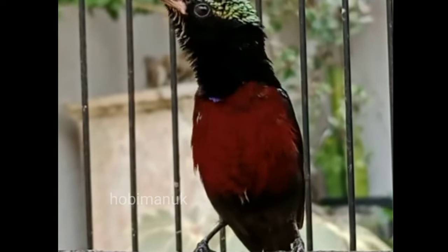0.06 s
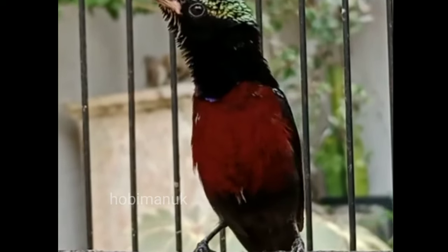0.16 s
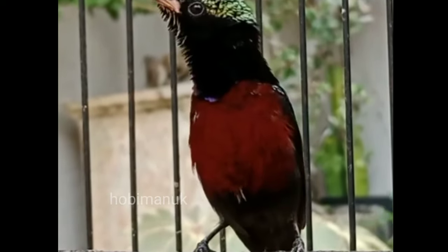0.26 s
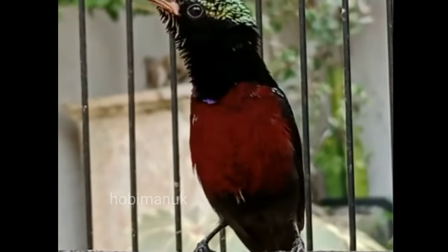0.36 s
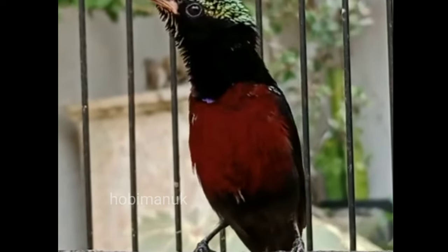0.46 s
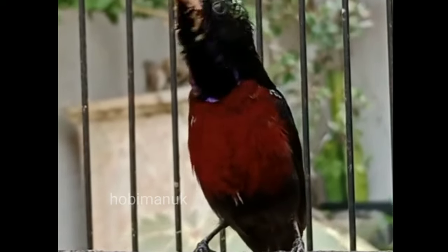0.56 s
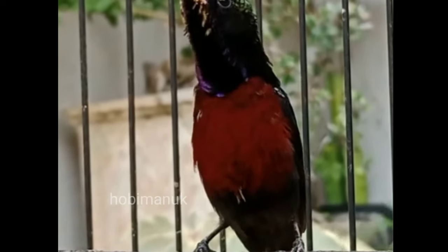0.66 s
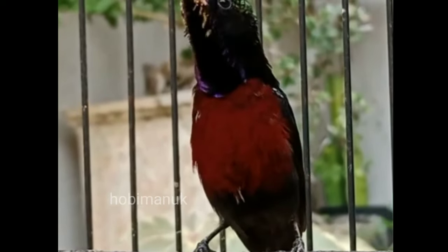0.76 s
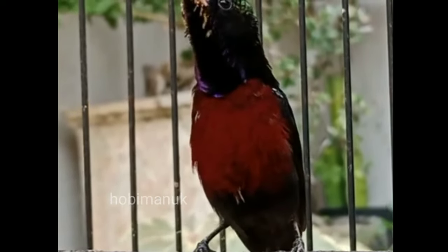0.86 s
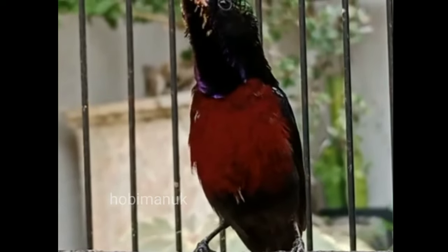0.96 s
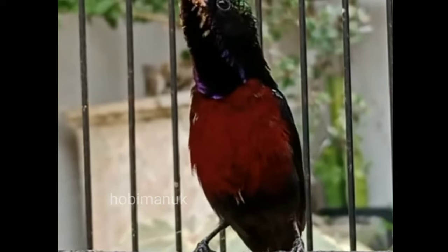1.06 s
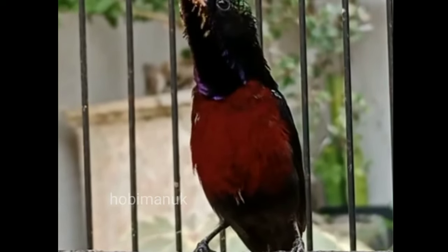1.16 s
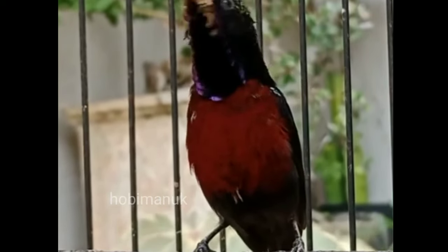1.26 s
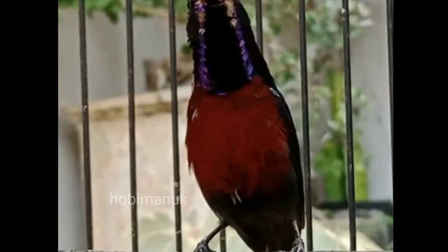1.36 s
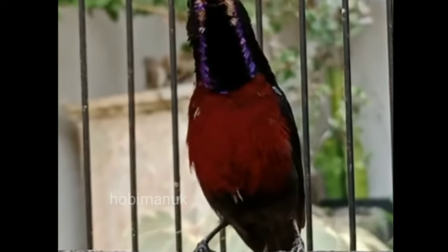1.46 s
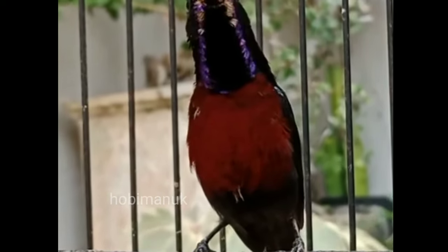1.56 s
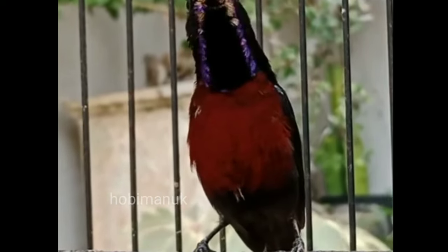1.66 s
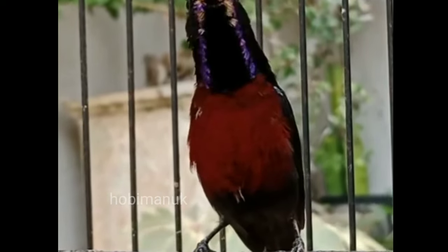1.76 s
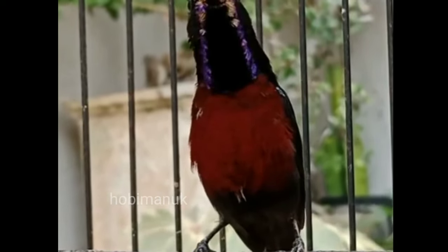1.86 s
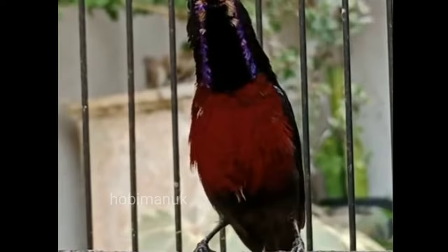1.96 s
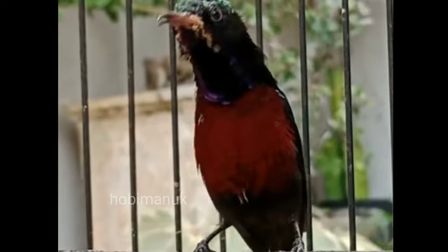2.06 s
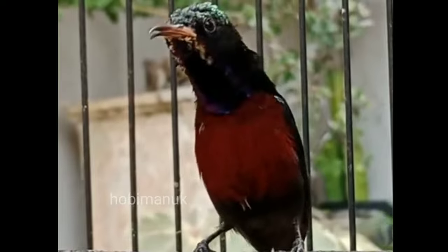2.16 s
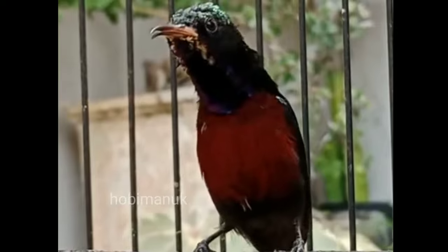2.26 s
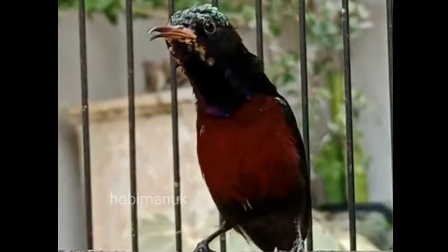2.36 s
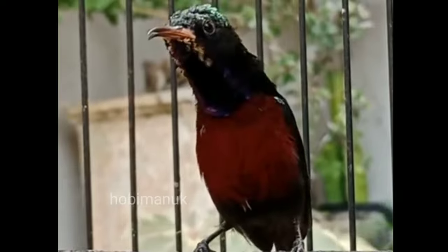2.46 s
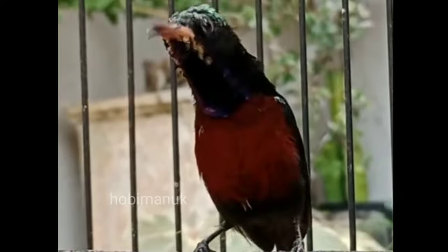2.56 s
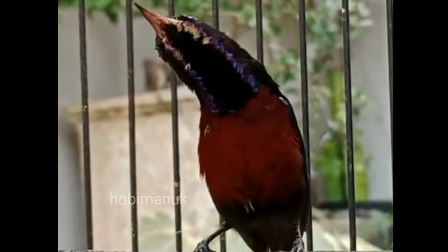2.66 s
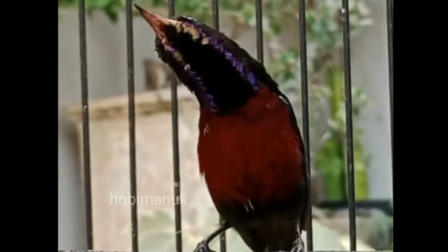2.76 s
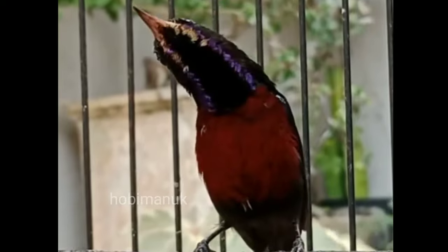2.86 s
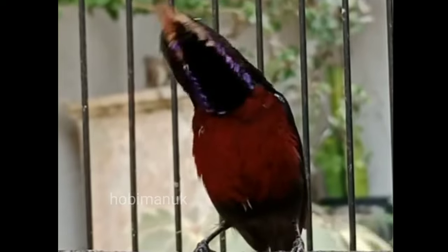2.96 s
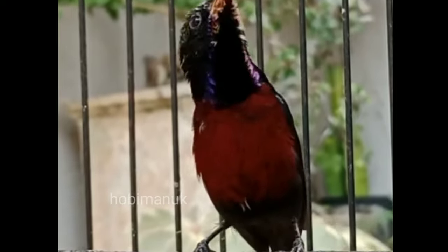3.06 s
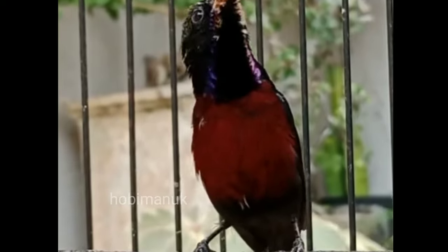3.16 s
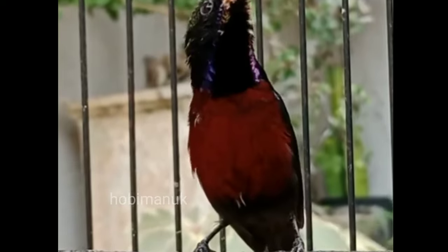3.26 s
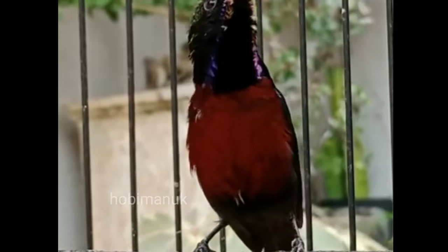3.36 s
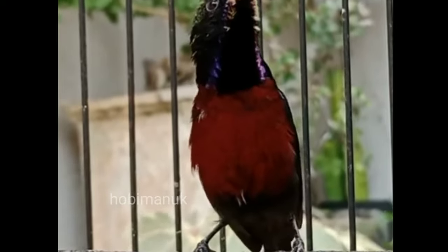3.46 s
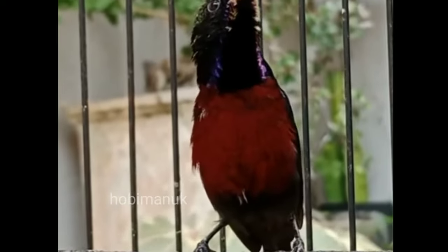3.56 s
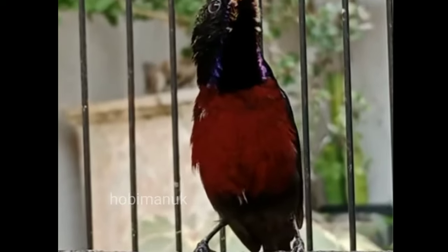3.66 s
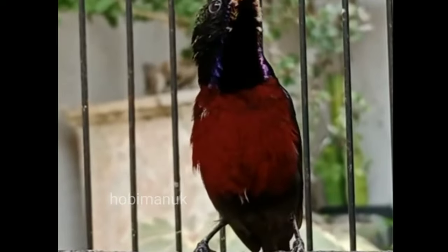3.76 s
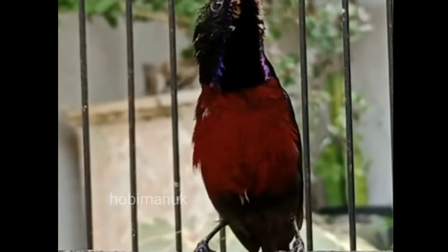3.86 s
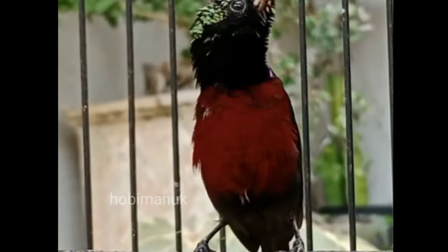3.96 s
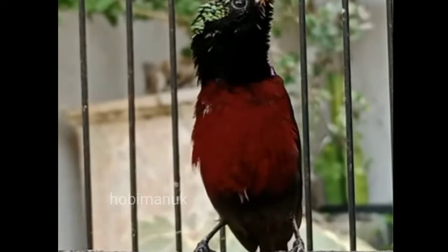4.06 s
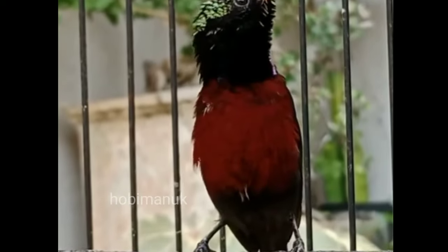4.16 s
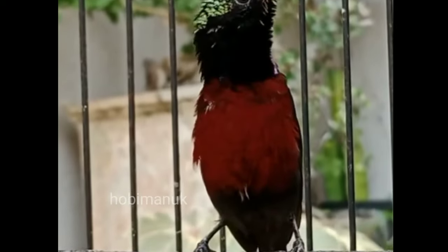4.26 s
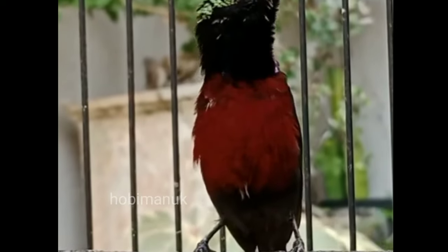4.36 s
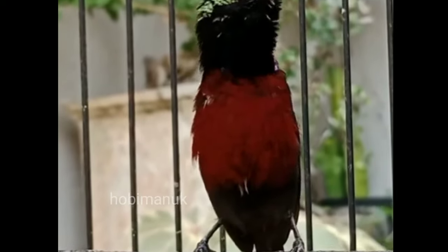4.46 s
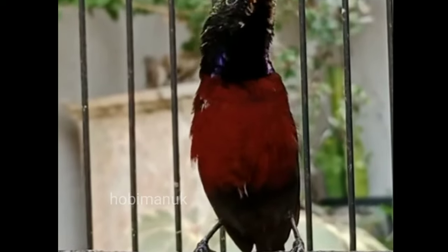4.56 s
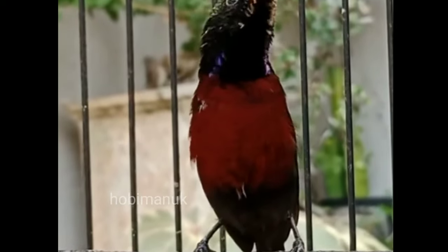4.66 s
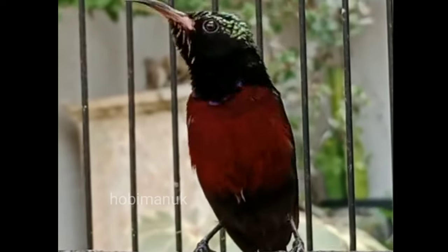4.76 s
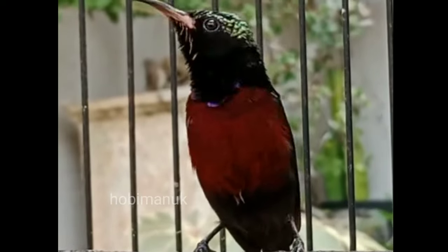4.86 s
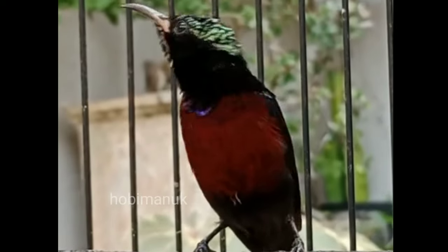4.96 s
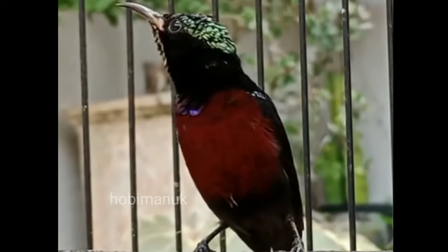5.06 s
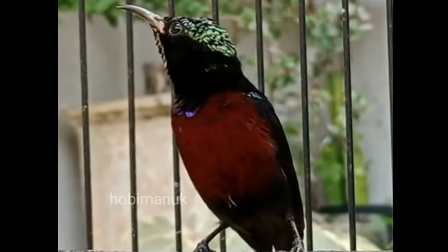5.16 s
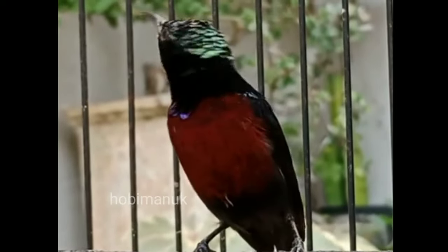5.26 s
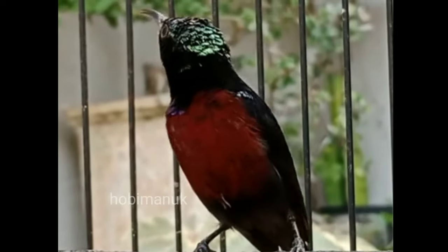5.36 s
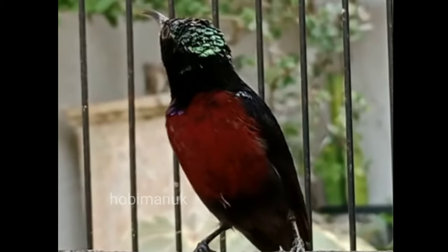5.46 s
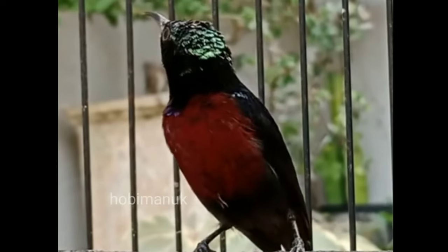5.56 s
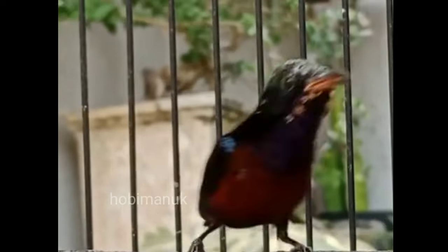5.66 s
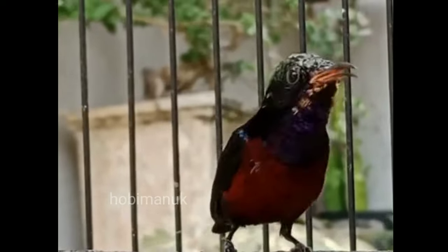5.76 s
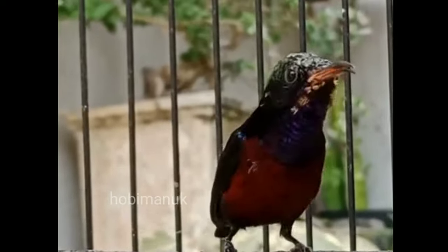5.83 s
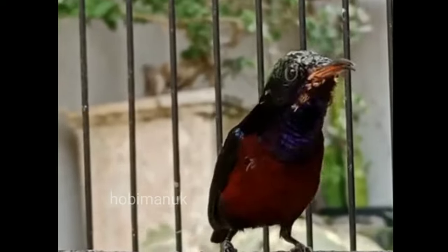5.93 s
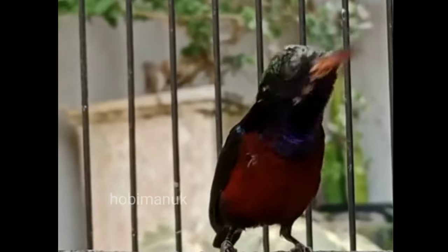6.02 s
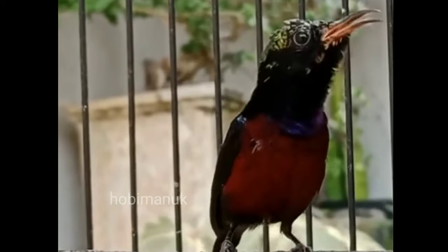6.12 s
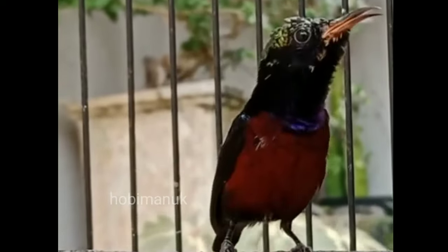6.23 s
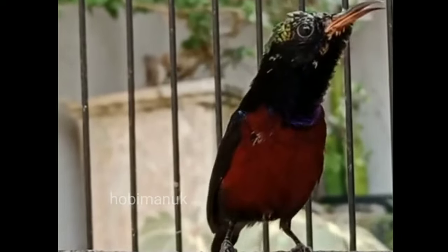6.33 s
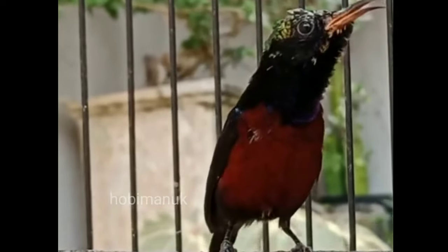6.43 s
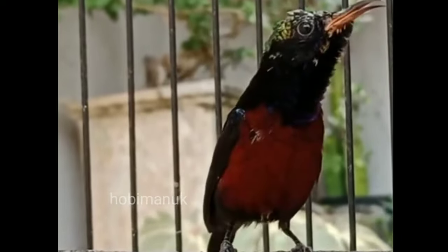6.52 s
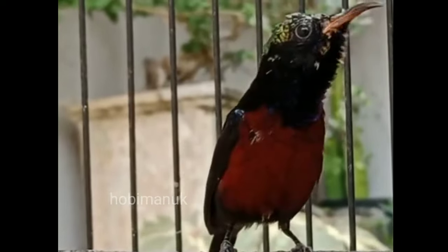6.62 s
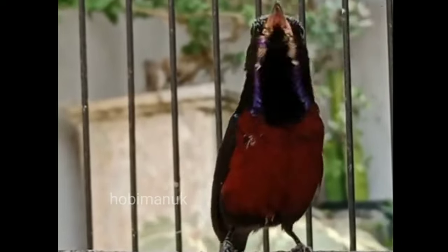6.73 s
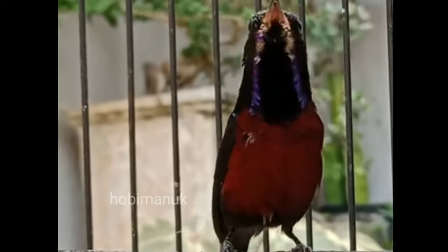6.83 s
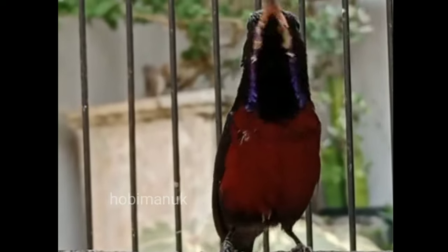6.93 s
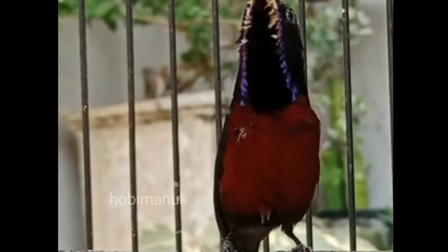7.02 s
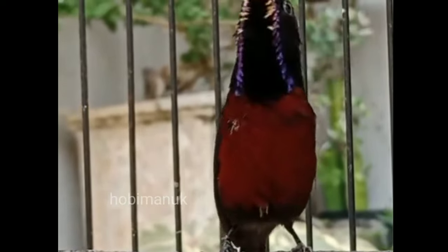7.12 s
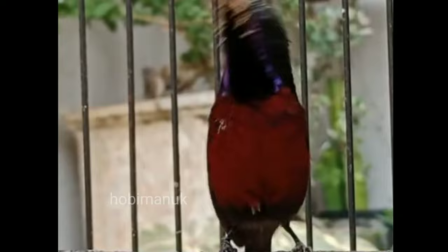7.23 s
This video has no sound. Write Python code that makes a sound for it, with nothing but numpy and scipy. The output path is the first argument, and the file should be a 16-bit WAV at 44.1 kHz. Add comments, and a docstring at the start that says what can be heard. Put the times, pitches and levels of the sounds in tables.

```python
"""The last few milliseconds of a shrill buzz open over faint hiss: a caged sunbird sings right at the
microphone in a small yard. Whistles and buzzes are sines with unsteady pitch; raspy upward chips are sweeps
with sidebands; two-voiced notes add sum tones. A limiter holds the loudest notes down, with slight clipping,
and walls answer briefly.
Behind it, wind noise swells and thumps, bubbles of water trickle and another bird calls far off."""
import sys
import numpy as np
from scipy import signal
from scipy.fft import rfft, irfft, next_fast_len
from scipy.io import wavfile
from scipy.ndimage import uniform_filter1d, map_coordinates

SR = 44100
rng = np.random.default_rng(int(sys.argv[2]) if len(sys.argv) > 2 else 0)


def transcribe(signal):
    """Save signal, clipped to [-1, 1], as a 16-bit WAV file at the path in sys.argv[1]."""
    frames = np.atleast_2d(signal).T
    limited = np.clip(frames, -1, 1)
    pcm = np.round(limited * 32767).astype(np.int16)
    wavfile.write(sys.argv[1], SR, pcm)


N = 321472

# colour of the air noise inside a sung note: (frequency_hz, density_db per Hz)
RASP_SPECTRUM = [(1500, -26), (2800, -2.5), (3600, 7), (4900, -7), (6500, -11.5), (9500, 0), (11500, -5.5),
                 (14300, -4.5), (15500, -24)]


def amp(db):
    """Decibels to linear gain."""
    return 10 ** (np.asarray(db) / 20)


def unit(x):
    """Scale a signal to rms 1."""
    return x / np.sqrt(np.mean(x ** 2) + 1e-20)


def along(points, hz):
    """Read a curve of (Hz, value) points on a log frequency axis."""
    f, v = np.transpose(points)
    return np.interp(np.log(np.abs(hz) + 1), np.log(f + 1), v)


def filtered(x, response):
    """Multiply the spectrum of x by a response of frequency."""
    n = x.shape[-1]
    m = next_fast_len(n + 2048)
    return irfft(rfft(x, m) * response(np.fft.rfftfreq(m, 1 / SR)), m)[..., :n]


def coloured(x, spectrum):
    """Filter x by a curve of (Hz, dB) points."""
    return filtered(x, lambda hz: amp(along(spectrum, hz)))


def noise(spectrum, size=N):
    """Coloured noise of rms 1."""
    return unit(coloured(rng.standard_normal(size), spectrum))


def wobble(t, rate):
    """A smooth random curve over a note, with rate knots a second."""
    return map_coordinates(rng.standard_normal(1024), [t * rate], mode="wrap")


def cycle(hz):
    """Phase of an oscillator that follows a pitch curve."""
    return 2 * np.pi * np.cumsum(hz) / SR


def partial(hz, phase):
    """A sine that fades out as its pitch climbs from 17.8 to 19.8 kHz."""
    return np.sin(phase) * np.clip((SR * .45 - hz) / 2000, 0, 1)


def arc(length, start_hz, middle_hz, end_hz):
    """A note's clock and its pitch, which bends in one smooth arch or dip."""
    t = np.arange(int(length * SR)) / SR
    u = t / length
    bend = middle_hz - (start_hz + end_hz) / 2
    return t, start_hz + (end_hz - start_hz) * u + bend * (1 - (2 * u - 1) ** 2)


def envelope(t, attack, release, depth_db):
    """Gain of a note: it climbs from depth_db down, holds, and sinks back."""
    shortfall = np.maximum(1 - t / attack, 0) + np.maximum(1 - (t[-1] - t) / release, 0)
    return amp(-depth_db * shortfall)


def add(track, s, note, edge=0.00067):
    """Lay a note into the track at s seconds, its ends softened over edge seconds."""
    k = np.arange(len(note))
    fade = np.clip(np.minimum(k, k[::-1]) / (edge * SR), 0, 1)
    note = note * np.sin(np.pi / 2 * fade) ** 2
    part = track[max(0, round(s * SR)):][:len(note)]
    part += note[:len(part)]


def patchy(x, patchy_db=4.0):
    """Outdoor air swells and fades in patches of time and pitch."""
    z = signal.stft(x, nperseg=512)[2]
    across_pitch = uniform_filter1d(rng.standard_normal(z.shape), size=7, axis=0)
    field = uniform_filter1d(across_pitch, size=14, axis=1)
    return unit(signal.istft(z * amp(patchy_db * unit(field)), nperseg=512)[1][:N])


def air():
    """Background hiss of the yard: patchy noise in the middle and a part of opposite sign left and right."""
    # slow level of the hiss, before the mix trims: (time_s, level_db)
    hiss_level = [(0, -45.5), (2.1, -48), (4.5, -47), (5.1, -51), (6.2, -46.5), (7.29, -45.5)]
    # colour of the middle: (frequency_hz, density_db per Hz)
    middle_spectrum = [(100, -7.5), (250, -4), (500, -7), (1000, -10), (2000, -9), (5000, -8.5),
                       (8000, -17), (11000, -8.5), (15500, -15.5)]
    # colour of the part that differs left to right: (frequency_hz, density_db per Hz)
    side_spectrum = [(40, 3.5), (150, -4), (400, -19.5), (1200, -11.5), (5000, -8), (8000, -14.5),
                     (15500, -7.5)]
    gain = amp(np.interp(np.arange(N) / SR, *np.transpose(hiss_level)))
    middle = amp(0.5) * gain * patchy(noise(middle_spectrum))
    side = amp(-0.5) * gain * noise(side_spectrum)
    return middle + np.array([side, -side])


def gusts(rise_db_per_s=297, draught_db=-46):
    """Strength of the wind: each gust builds quickly and dies away over a steady draught."""
    # gusts that swell the rumble: (peak_s, rumble_db, fall_db per s)
    gust_rows = [(1.33, -18.5, 80.5), (1.43, -17.5, 63.5), (2.2, -36.5, 66), (2.71, -21, 66),
                 (3.0, -35, 101), (3.46, -37, 90), (5.96, -39, 39)]
    t = np.arange(N) / SR
    power = amp(draught_db) ** 2
    for s, db, fall_db in gust_rows:
        drop_db = np.maximum(rise_db_per_s * (s - t), fall_db * (t - s))
        power = power + amp(db - drop_db) ** 2
    return np.sqrt(power)


def wind(unrest=0.066):
    """A low draught of rumbling noise, and single eddies that thump on the microphone."""
    # colour of the rumble: (frequency_hz, density_db per Hz)
    rumble_spectrum = [(15, -12), (35, -7), (60, -2.5), (120, -8.5), (200, -21), (400, -39), (1200, -64.5)]
    # eddies: (centre_s, half-width_s of the bell-shaped swell at 1/e, pitch_hz, peak_db)
    eddies = [(1.336, 0.01, 79.6, -6), (1.36, 0.027, 48.5, -12), (1.423, 0.0048, 113, -0.5),
              (1.448, 0.024, 50.7, -0.5), (1.513, 0.026, 41.6, -9.5), (1.579, 0.021, 54.7, -17),
              (2.715, 0.0185, 65, -8), (2.798, 0.01, 88, -16), (2.818, 0.019, 49, -16.5),
              (3.007, 0.023, 52, -17.5)]
    out = gusts() * noise(rumble_spectrum)
    for s, length, hz, db in eddies:
        t = np.arange(int(6 * length * SR)) / SR
        lead = t[-1] / 2
        phase = cycle(hz * np.exp(unrest * wobble(t, 110)))
        swing = -np.cos(phase - phase[len(t) // 2])  # suction is deepest at the eddy's centre
        bell = np.exp(-((t - lead) / length) ** 2)
        add(out, s - lead, amp(db) * swing * bell)
    return out


def trickle(count=220, pitch_hz=1450):
    """Bubbles in running water ring briefly and rise in pitch."""
    out = np.zeros(N)
    for when, (spread, size, speed) in zip(rng.random(count), rng.standard_normal((count, 3))):
        hz = pitch_hz * np.exp(.36 * spread)
        u = np.linspace(0, 1, int(34 / hz * SR))  # 34 periods of the starting pitch
        rise = .22 * np.exp(.5 * speed)
        ring = np.sin(cycle(hz * (1 + rise * u)))
        add(out, when * N / SR, amp(-52.5 + 3 * size - 7 * u) * ring, edge=.004)
    return out


def far_bird():
    """Soft hoots and a hoarse call: sines whose random pitch scatter sets the hoarseness."""
    # distant calls: (start_s, length_s, pitch_hz, level_db before the mix, scatter as a share of the pitch)
    calls = [(1.078, 0.075, 1248, -30.5, .008), (1.14, 0.31, 1800, -48.5, 0.042),
             (1.13, 0.18, 1650, -45.5, .13), (1.1, 0.16, 2650, -45.5, 0.11),
             (2.82, 0.19, 1350, -53.5, 0.012), (6.38, 0.076, 1315, -46.5, 0.0087)]
    out = np.zeros(N)
    for s, length, hz, db, scatter in calls:
        t = np.arange(int(length * SR)) / SR
        pitch_hz = hz * (1 + scatter * wobble(t, 500))
        add(out, s, amp(db) * np.sin(cycle(pitch_hz)), edge=0.017)
    return out


def walls(x):
    """The direct sound and its echoes from the nearest surfaces."""
    # early echoes: (delay_s, level_db)
    echoes = [(.0055, -13.5), (.0092, -12.5), (0.0135, -18.5), (0.0189, -14)]
    out = x
    for delay, db in echoes:
        out = out + amp(db) * np.pad(x, (round(abs(delay) * SR), 0))[:N]
    return out


def yard(x, t60_scale=0.79):
    """A diffuse tail of decaying noise that starts 4 ms late and dies fastest at the band's two ends."""
    # decay time to -60 dB, before t60_scale: (frequency_hz, t60_s)
    decay_times = [(300, 0.18), (2500, 0.24), (7000, 0.22), (14000, 0.18)]
    hz, t, z = signal.stft(rng.standard_normal(SR // 2), SR, nperseg=256)
    t60 = t60_scale * along(decay_times, hz)[:, None]
    tail = signal.istft(z * amp(-60 * t / t60), SR, nperseg=256)[1]
    response = np.pad(tail / np.linalg.norm(tail), (round(.004 * SR), 0))
    return signal.fftconvolve(x, response)[:N]


def hisses():
    """Short toneless hisses between the phrases: gated noise."""
    # hisses: (start_s, length_s, level_db)
    hiss_rows = [(2.138, 0.049, -35.5), (2.448, 0.044, -25.5), (2.685, 0.056, -31.5), (6.554, 0.043, -34.5)]
    # their colour: (frequency_hz, density_db per Hz)
    hiss_spectrum = [(400, -27), (950, -3), (2500, 0.5), (5000, -9), (7600, -1.5), (10500, -12),
                     (15500, -11)]
    gate = np.zeros(N)
    for s, length, db in hiss_rows:
        add(gate, s, np.full(int(length * SR), amp(db)), edge=0.012)
    return gate * noise(hiss_spectrum)


def buzzes(swing_hz=750, flutter_rate=1200, flutter_db=6.0):
    """A shrill high tone whose pitch and strength flutter chaotically."""
    # buzzes: (start_s, length_s, start_hz, middle_hz, end_hz, level_db, attack_s, release_s)
    buzz_rows = [ (0.111, .024, 7310, 7390, 7330, -23, .002, .002),
                 (0.134, .117, 6760, 7230, 7310, -8.5, 0.0052, .024),
                 (0.366, .113, 8800, 8195, 8050, -7, 0.05, 0.021)]
    # band the buzzes pass through: (frequency_hz, gain_db)
    buzz_band = [(4500, -34.5), (5500, -14), (6100, -4), (8800, -0.5), (9500, -12), (10500, -29)]
    out = np.zeros(N)
    for s, length, start_hz, middle_hz, end_hz, db, attack, release in buzz_rows:
        t, hz = arc(length, start_hz, middle_hz, end_hz)
        phase = cycle(hz + swing_hz * np.tanh(wobble(t, flutter_rate)))
        strength = amp(db + flutter_db * wobble(t, flutter_rate))
        add(out, s, strength * envelope(t, attack, release, depth_db=15) * np.sin(phase))
    return coloured(out, buzz_band)


def duets(waver=0.0057, double_db=-4, top_db=-26, rasp_db=-23):
    """Two voices beat together; their coupling makes sum tones an octave up, which grow through the note."""
    # notes sung with both sides of the syrinx: (start_s, length_s, lower voice's start_hz, middle_hz, end_hz,
    # upper/lower pitch ratio, level_db, attack_s, release_s, upper voice_db, scatter as a share of the pitch,
    # octave band at the start_db, at the end_db)
    duet_rows = [ (3.880, .038, 3600, 3052, 2584, 1.55, -8.5, .009, 0.024, -9, .017, -20.5, -10.5),
                 (6.778, .065, 2663, 2866, 2512, 1.16, -6, 0.019, .012, -1, .007, -18.5, 14),
                 (6.970, .073, 2368, 2578, 2562, 1.125, -9, 0.017, 0.014, -5, 0.011, -4, 13)]
    out = np.zeros(N)
    for (s, length, start_hz, middle_hz, end_hz, interval, db, attack, release,
         upper_db, rough, first_db, last_db) in duet_rows:
        t, low_hz = arc(length, start_hz, middle_hz, end_hz)
        octave_db = np.linspace(first_db, last_db, len(t))
        # each voice wavers on its own
        a, b = (cycle(hz * (1 + waver * wobble(t, 700) + rough * wobble(t, 1500)))
                for hz in (low_hz, interval * low_hz))
        voices = np.sin(a) + amp(upper_db) * (np.sin(b) + amp(-10.5) * np.sin(2 * b - a))
        sums = np.sin(a + b) + amp(double_db) * np.sin(2 * a) + amp(-10.5) * np.sin(2 * a + a - b)
        top = np.sin(2 * a + b) + np.sin(2 * (a + b))
        rasp = amp(rasp_db) * noise(RASP_SPECTRUM, size=len(t))
        tone = voices + amp(octave_db) * sums + amp(top_db) * top + rasp
        add(out, s, amp(db) * envelope(t, attack, release, depth_db=18) * tone)
    return out


def chips(steep=6.5, swell=0.29, onset_db=26, rasp_rate=1800, octave_db=-3, third_db=-8, throb_hz=1150,
          turbulence_db=-10):
    """A raspy voice sweeps up into the beak resonance; a slower vibration chops it into parallel sidebands."""
    # upward chips: (start_s, length_s, start_hz, end_hz, mid-glide as a share of the length,
    # level_db before a common trim, rasp 0-1, treble_db)
    chip_rows = [ (1.784, .045, 2565, 6555, 0.58, 5.5, 0.8, 2),
                 (1.927, 0.049, 2328, 6790, 0.61, 2, .75, 1.5),
                 (3.081, 0.065, 2246, 7414, 0.62, 10, 0.6, -4.5),
                 (3.295, .061, 2270, 7030, .6, 8.5, 0.4, -3.5),
                 (3.495, .048, 2236, 6466, 0.64, 7.5, .55, -4),
                 (5.774, .038, 2204, 5700, 0.55, -18.5, 0.13, -42),
                 (5.879, 0.069, 2468, 6500, .72, -1.5, 0.4, -36.5),
                 (6.074, .074, 2589, 6545, .6, 6, 0.5, 6), (6.255, .077, 2534, 6600, .68, 8.5, 0.3, 4.5)]
    # throat and beak: (frequency_hz, gain_db)
    beak_response = [(700, -46), (1800, -18.5), (2600, -21), (4000, -15.5), (6000, -7), (7200, -10.5),
                     (8500, -11), (10500, -16), (14000, -2), (16000, -14.5)]
    # at full roughness: pitch scatter (share of the pitch), wild at the slack start and steadier at the top
    jitter_start, jitter_top, flutter_db = .13, .03, 4
    out = np.zeros(N)
    for s, length, start_hz, end_hz, middle, db, rasp, treble_db in chip_rows:
        t = np.arange(int(length * SR)) / SR
        u = t / length
        glide = 1 / (1 + np.exp(-steep * (u - middle)))
        glide = (glide - glide[0]) / (glide[-1] - glide[0])
        rough = rasp * (1 - 0.63 * glide)
        jitter = jitter_top + (jitter_start - jitter_top) * (1 - glide) ** 4
        hz = (start_hz + (end_hz - start_hz) * glide) * (1 + jitter * rough * wobble(t, rasp_rate))
        phase = cycle(hz)
        throb = cycle(throb_hz * (1 + .1 * wobble(t, 199.8)))
        # overtones and sidebands weaken as the membranes tighten
        depth = np.minimum(1.4 * rasp, 1) * (1 - glide ** 6)
        sidebands = np.exp(1j * throb) + .6 * glide * np.exp(-1j * throb) + .4 * np.exp(2j * throb)
        chop = 1 + depth * sidebands
        stack = enumerate([0, octave_db - 10 * glide, third_db - 13 * glide], 1)
        voice = sum(amp(k_db) * partial(k * hz, k * phase + np.angle(chop)) for k, k_db in stack)
        flutter = amp(flutter_db * rough * wobble(t, rasp_rate))
        turbulence = amp(turbulence_db) * rough * rng.standard_normal(len(t))
        source = np.abs(chop) * voice * flutter + turbulence
        effort = amp(db - 2.5 - onset_db * np.maximum(1 - u / swell, 0))
        add(out, s, coloured(effort * source, [(6700, 0.003), (7400, treble_db)]))
    return coloured(out, beak_response)


def whistles(waver=.004, blur=.3, vibrato_hz=143, shimmer_db_per_vibrato=40, doubling_db=3):
    """One side of the syrinx sings a nearly pure tone with fast vibrato, unsteady overtones and some rasp."""
    # pure notes, the first of them the end of a buzz: (start_s, length_s, start_hz, middle_hz, end_hz,
    # level_db, attack_s, release_s, vibrato as a share of the pitch, overtones_db, rasp_db)
    whistle_rows = [ (0, 0.017, 6470, 7000, 7250, -0.5, 0.00058, 0.016, .02, -26, -48.5),
                    (0.616, .026, 4146, 4100, 3937, -13, .01, .003, .024, -6, -41.5),
                    (.638, 0.047, 3934, 3674, 3930, 0, .005, 0.022, .024, -10, -38.5),
                    (1.091, 0.076, 4210, 4916, 4810, -1.5, 0.018, 0.016, .029, -6.5, -40),
                    (1.16, 0.06, 4330, 4650, 4164, -7.5, .004, .006, .029, -6.5, -35),
                    (1.22, .038, 4876, 5280, 5510, -21, .004, 0.0022, .025, 0, -31.5),
                    (1.382, 0.016, 5430, 4234, 2765, -21, 0.0024, 0.0022, .009, 0.5, -13),
                    (1.391, .015, 6540, 6310, 5970, -18.5, 0.00091, .003, .004, 7, -17.5),
                    (1.402, .023, 5880, 5457, 4474, -4, .006, .008, .004, 4, -19),
                    (1.628, 0.025, 4990, 5433, 5340, -3.5, 0.0075, 0.0034, .004, -0.5, -54),
                    (1.67, .032, 5194, 5322, 5396, 2, 0.012, 0.0062, .003, 5, -48),
                    (4.269, 0.028, 3760, 3578, 3280, -14.5, 0.018, 0.0087, .006, 11, -29),
                    (4.4, 0.045, 4134, 3744, 3576, -5.5, 0.025, 0.018, .008, -3.5, -55),
                    (4.508, .074, 2930, 3056, 2886, -10.5, 0.02, .005, .002, 2.5, -53.5),
                    (7.143, .106, 2470, 2472, 2183, -5.5, 0.026, .024, 0.0036, 8, -28.5)]
    # overtones, before each note's own overtone level: (multiple of the pitch, level_db)
    overtone_rows = [(2, -23), (3, -29.5), (4, -36), (5, -41), (6, -46)]
    # the beak's colour on the overtones: (frequency_hz, gain_db)
    overtone_band = [(5000, -2.5), (9000, -1), (12500, -0.5), (14300, 6.5), (15800, 2)]
    out = np.zeros(N)
    for (s, length, start_hz, middle_hz, end_hz, db, attack, release,
         vibrato, overtone_db, rasp_db) in whistle_rows:
        t, hz = arc(length, start_hz, middle_hz, end_hz)
        tremble = np.sin(2 * np.pi * vibrato_hz * t) + .5 * wobble(t, 600)
        hz = hz * (1 + vibrato * tremble + waver * wobble(t, 349.6))
        phase = cycle(hz)
        overtones = sum(amp(k_db) * partial(round(k) * hz, round(k) * phase + blur * wobble(t, 900))
                        for k, k_db in overtone_rows)
        # a raspy whistle also doubles its period: lines halfway between the overtones
        halves = sum(partial((k + .5) * hz, (k + .5) * phase + wobble(t, 300)) for k in range(1, 6))
        rasp = noise(RASP_SPECTRUM, size=len(t)) + amp(doubling_db) * halves / 2
        rasp = rasp * 2 * t / length  # grows as the note goes on
        tone = np.sin(phase) + amp(overtone_db) * coloured(overtones, overtone_band) + amp(rasp_db) * rasp
        # deep vibrato shakes the level too
        strength = amp(db + shimmer_db_per_vibrato * vibrato * wobble(t, 270))
        add(out, s, strength * envelope(t, attack, release, depth_db=25) * tone)
    return out


def scene():
    """The near bird with its echoes, over the sounds of the yard; almost mono."""
    far = far_bird()
    distant = 0.7 * far + amp(7) * yard(far, t60_scale=1.2)
    surroundings = distant + trickle() + wind() + air()
    pure = whistles() + duets()
    harsh = chips() + buzzes() + hisses()
    song = walls(pure + harsh) + amp(-8.5) * yard(pure) + amp(-5.5) * yard(harsh)
    return song + surroundings


def record(dry, top=0.94, hardness=7, top_hz=15750):
    """A limiter holds the loudest notes down near top, with slight clipping; nothing passes above top_hz."""
    limited = dry / (1 + np.abs(dry / top) ** hardness) ** (1 / hardness)
    return filtered(limited, lambda hz: hz < top_hz)


dry = scene()
out = record(dry)
transcribe(out)
```